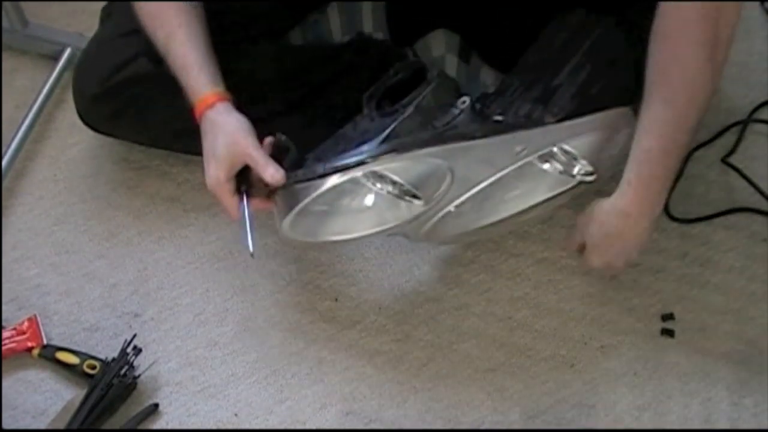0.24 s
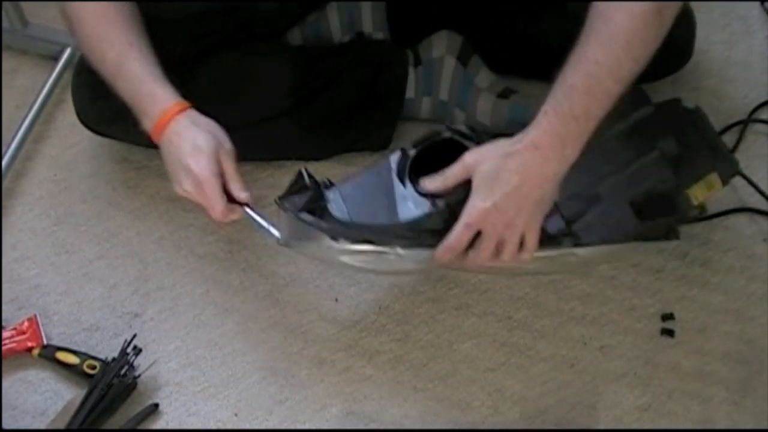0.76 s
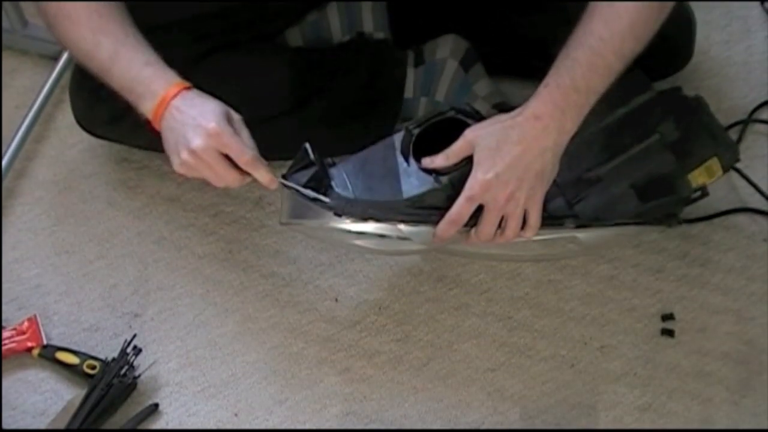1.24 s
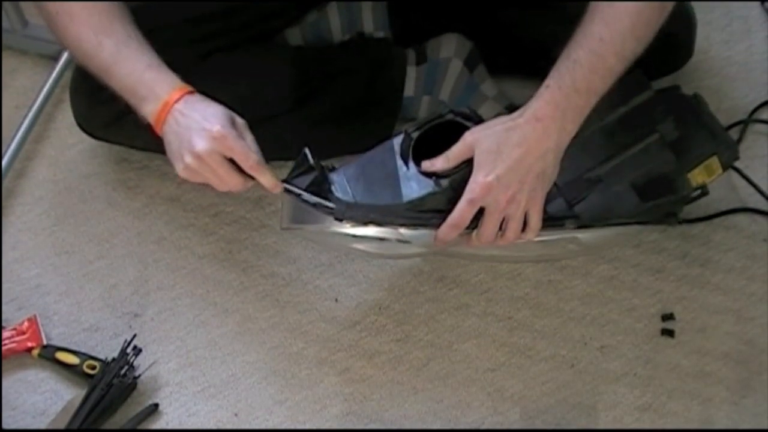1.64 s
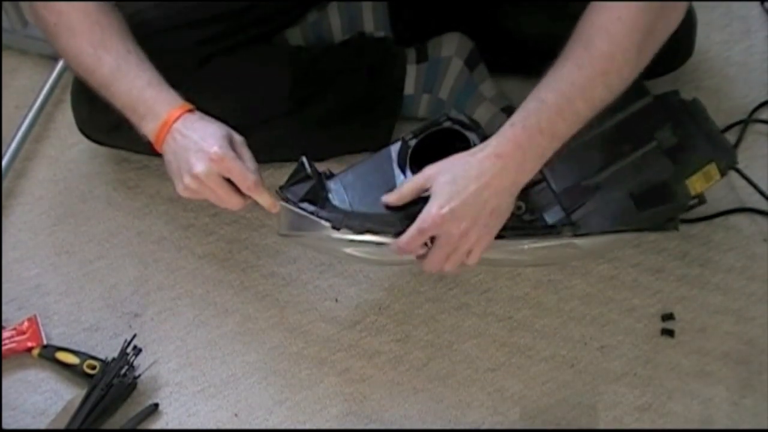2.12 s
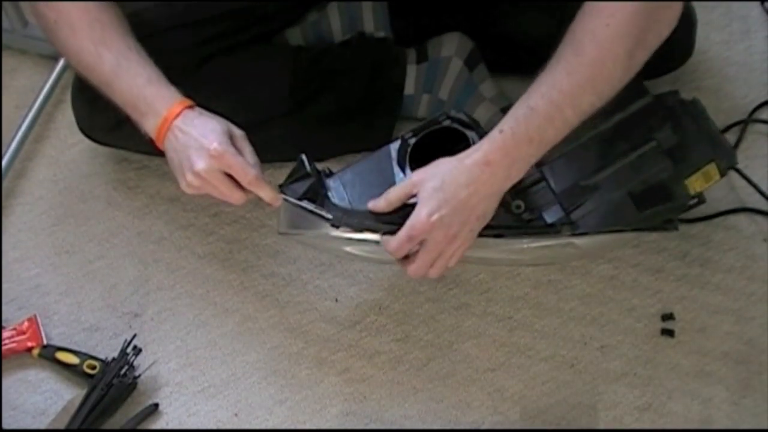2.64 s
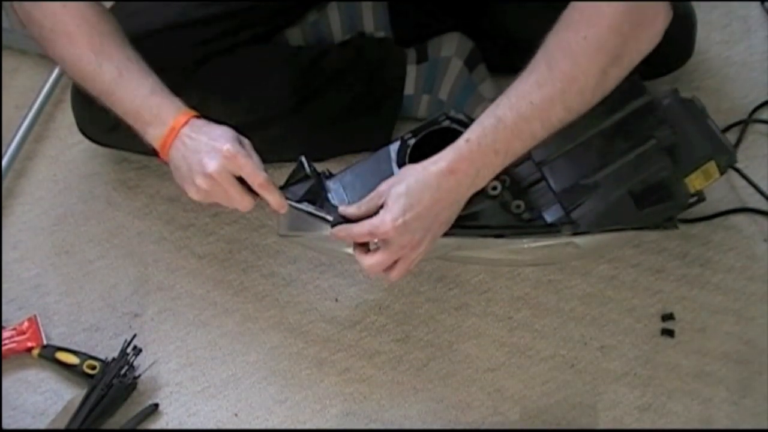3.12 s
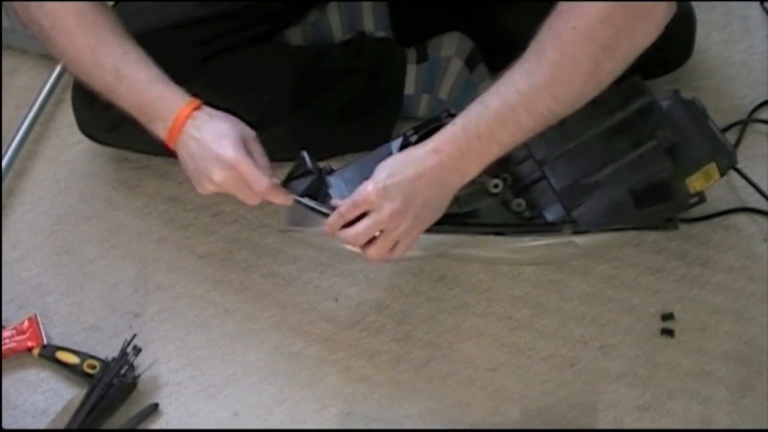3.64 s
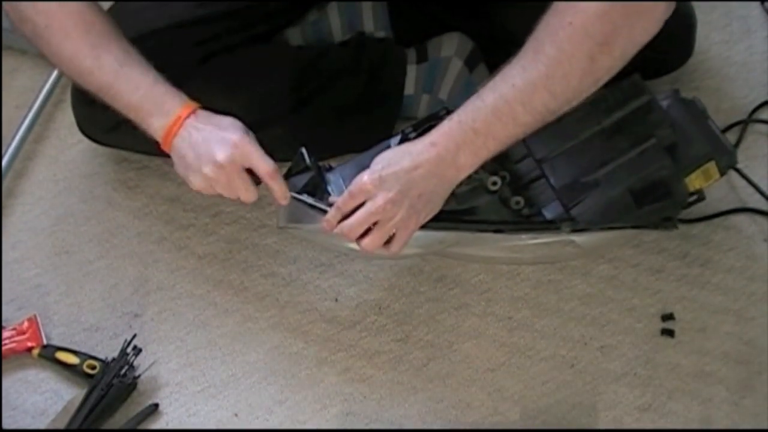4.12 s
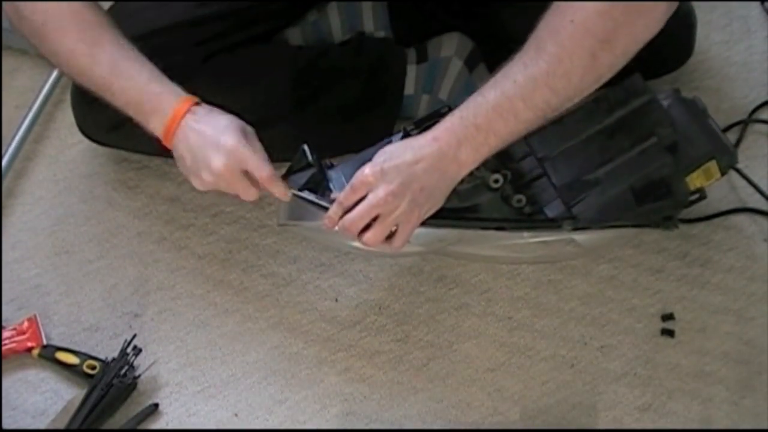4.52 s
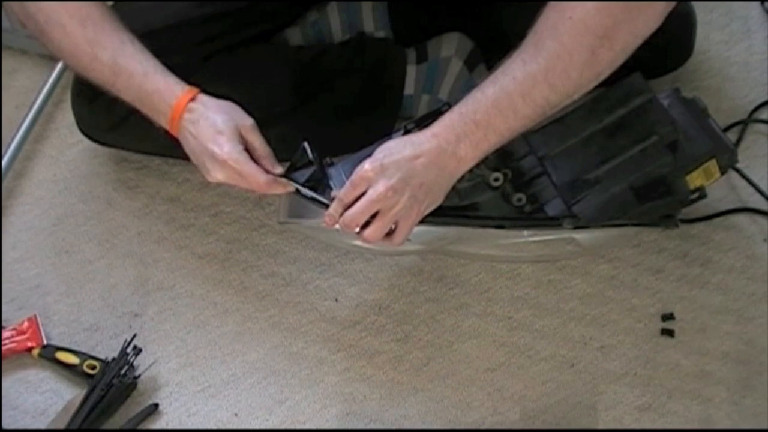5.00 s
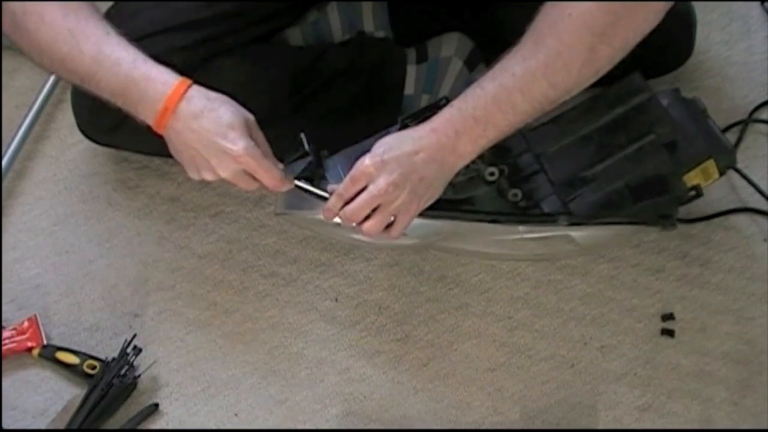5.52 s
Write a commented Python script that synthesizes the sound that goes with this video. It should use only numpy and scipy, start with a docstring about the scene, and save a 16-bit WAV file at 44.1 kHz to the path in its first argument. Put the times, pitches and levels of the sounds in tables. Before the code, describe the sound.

A plastic headlight housing lands on carpet with a hollow juddering thud, a thin blade ticks and scrapes along its rim, then a steel clip snaps off.

```python
"""A thin screwdriver pries steel spring clips off a plastic headlight housing on the carpet of a small room.
The housing is turned over and set down, the blade ticks and scrapes along its rim, and at last a clip snaps off.
Blows excite decaying modes over noise bursts; drags, hands, cloth and carpet are coloured friction noise in swells.
Judders and squeaks are stick-slip pulses; noise echoes make the room, over air noise, mains hum and faint pips."""
import sys
import numpy as np
from scipy import signal
from scipy.fft import rfft, irfft, next_fast_len
from scipy.io import wavfile
from scipy.ndimage import uniform_filter1d

SR = 44100
rng = np.random.default_rng(int(sys.argv[2]) if len(sys.argv) > 2 else 0)


def unload_wav(signal):
    """Save mono or channel-first audio to the path in sys.argv[1] as 16-bit WAV at rate SR, clipped to [-1, 1]."""
    wavfile.write(
        sys.argv[1],
        SR,
        np.round(np.clip(np.atleast_2d(signal).T, -1, 1) * 32767).astype(np.int16),
    )


N = 254324
RING_S = .16  # window of one short sound
T = np.arange(N) / SR
AGE = np.arange(int(RING_S * SR)) / SR
ECHO_AGE = np.arange(int(.4 * SR)) / SR

# air modes inside the housing: f/Hz, level/dB, t60/s
CAVITY_MODES = [(191.8, 5.5, 0.15), (232, 1.5, 0.31), (277, -3, 0.053), (324.4, -3, 0.23),
                (370.5, -1, 0.18), (475.8, -0.5, 0.23)]
# wall modes of the housing: f/Hz, level/dB, t60/s
SHELL_MODES = [(599, -4, 0.05), (765, -4, 0.083), (900, 0, 0.093), (990, -3.5, 0.068), (1119, 4.5, 0.026),
               (1301, -11, 0.019)]
# stiff ribs next to the blade: f/Hz, level/dB, t60/s
RIB_MODES = [(2784, 0.5, 0.041), (2932, -2.5, 0.05), (3145, 1, 0.045), (3590, 1, 0.046),
             (3830, -1.5, 0.042), (3997, -5, .025), (4594, 1, .03)]
# grooved rim that holds the clips: f/Hz, level/dB, t60/s
RIM_MODES = [(1587, -9.5, 0.055), (1706, 2.5, 0.042), (1844, -2.5, 0.06), (1984, -3, 0.045),
             (2138, -1.5, 0.026)]
# steel of clip and blade, damped by plastic and hand: f/Hz, level/dB, t60/s
STEEL_MODES = [(4676, -6.5, 0.011), (4746, 2, 0.016), (5020, 6.5, 0.019), (5220, 2, 0.013), (5450, 6, .007),
               (6050, -4, 0.012)]
# colour of the cavity's dense modes: f/Hz, level/dB
THUMP_COLOUR = [(80, -49), (150, -5.5), (195, 11.5), (250, 9), (350, -7), (500, 5.5), (800, 4),
                (2000, -31.5)]


def undb(db):
    """Decibels to gain."""
    return 10 ** (np.asarray(db) / 20)


def along(points, hz):
    """Read (f/Hz, value) points on a log-frequency axis."""
    f, value = np.transpose(points)
    return np.interp(np.log(np.maximum(hz, 1)), np.log(f), value)


def colour(x, points):
    """Causal minimum-phase filter with the given (f/Hz, level/dB) response, built from its cepstrum."""
    size = 2 * next_fast_len(len(x))
    log_gain = np.log(undb(along(points, np.fft.rfftfreq(size, 1 / SR))))
    cepstrum = irfft(log_gain)
    cepstrum[1:size // 2] *= 2
    cepstrum[size // 2 + 1:] = 0
    response = np.exp(rfft(cepstrum))
    return irfft(rfft(x, size) * response)[:len(x)]


def level(x, db):
    """Set the rms level."""
    return x * undb(db) / np.sqrt(np.mean(x ** 2))


def blow(x, db):
    """Set a short sound's energy to that of 20 ms at this rms level."""
    return x * undb(db) * np.sqrt(.02 * SR / np.sum(x ** 2))


def fade(t60, age=AGE):
    """Exponential decay from 1, down 60 dB after t60."""
    return np.exp(-np.log(1000) * age / np.maximum(t60, 1e-4))


def burst(t60, count=2):
    """Dying noise with an even spectrum: many modes too close to tell apart."""
    x = rng.standard_normal(len(AGE)) * fade(t60)
    for _ in range(count):
        flat = irfft(np.exp(1j * np.angle(rfft(x))), len(AGE))
        x = flat * fade(10 * t60) * (AGE < 2 * t60)
    return x


def ring(modes, scatter_db=1.0, detune=0.0036):
    """Struck modes; each point of contact and grip weights and shifts them a little."""
    hz, db, t60 = np.transpose(modes)[:, :, None]
    size, shift, sign = rng.standard_normal((3, len(modes), 1))
    waves = np.sign(sign) * np.sin(2 * np.pi * hz * (1 + detune * shift) * AGE)
    return np.sum(undb(db + scatter_db * size) * waves * fade(t60), axis=0)


def body(modes, spectrum, dense_t60, modes_db):
    """A struck part: clear modes over a quickly dying mass of others."""
    clear = blow(ring(modes), modes_db)
    dense = blow(colour(burst(dense_t60), spectrum), 0)
    return clear + dense


def add(track, s, x):
    """Mix a sound in at time s."""
    start = max(int(s * SR), 0)
    track[start:start + len(x)] += x[:N - start]


def friction(slips_per_s, spread_db, smooth_db):
    """Tiny slips of uneven size over the smooth hiss of sliding."""
    hits = rng.random(N) < slips_per_s / SR
    slips = hits * rng.standard_normal(N) * undb(spread_db * rng.standard_normal(N))
    return level(level(slips, 0) + undb(smooth_db) * rng.standard_normal(N), 0)


def swells(rows):
    """Each stroke swells and fades in a bell; overlapping strokes add in power."""
    return np.sqrt(sum(undb(db) ** 2 * np.exp(-((T - s) / half_s) ** 2) for s, half_s, db in rows))


def room_tone():
    """Steady air noise, wide in the bass, with mains hum, the thin whine of a small motor and pips."""
    # colour of the air noise: f/Hz, level/dB
    air_colour = [(15, -43.5), (25, -24), (54, -18), (88, -13), (121, -16), (176, -13.5), (438, -16.5),
                  (475, -16), (811, -22.5), (1090, -18.5), (1310, -24), (3540, -31), (11000, -40.5),
                  (15000, -51.5), (16000, -69)]
    # steady tones of hum and whine: f/Hz, level/dB
    hum_tones = [(119.3, -67), (721.4, -80.5), (1082, -74.5), (1443, -82.5)]
    # both start at equal rms, before the side colour and the mid gain
    mid, side = (level(colour(rng.standard_normal(N), air_colour), -58.5) for _ in range(2))
    side = colour(side, [(70, 1.0), (140, 5), (1000, 2), (8000, -5.5)])
    hum = sum(level(np.sin(2 * np.pi * (hz * T + rng.random())), db) for hz, db in hum_tones)
    return undb(-5.0) * mid + hum + pips() + side * np.array([[1], [-1]])


def rubbing():
    """Cloth, palms and pile hiss in strokes over a faint hand creep; cloth and creep make the shell murmur."""
    # housing brushes trousers and carpet: peak t/s, bell sigma/s, level/dB
    swish_rows = [(.1, 0.11, -62.5), (.315, 0.064, -55.5), (.41, 0.037, -55.5), (.52, 0.12, -51.5),
                  (.66, 0.049, -72), (.82, 0.021, -53.5), (.91, .035, -75), (1.06, 0.0073, -59.5),
                  (1.19, 0.047, -69), (2.08, 0.043, -61), (2.255, 0.011, -76), (2.72, 0.03, -71),
                  (2.94, 0.036, -61), (3.34, 0.081, -73.5)]
    # palm slides to a new hold: peak t/s, bell sigma/s, level/dB
    slide_rows = [(.088, 0.037, -49), (.31, 0.021, -74), (.41, 0.1, -55.5), (.56, 0.06, -56.5),
                  (.76, 0.081, -58), (.92, 0.014, -53.5), (1.08, 0.062, -77), (1.205, 0.091, -62.5),
                  (1.4, 0.1, -69), (2.045, 0.044, -61), (2.127, 0.011, -54.5), (2.245, 0.02, -61.5),
                  (2.61, 0.036, -59.5), (2.735, 0.053, -59.5), (2.93, 0.055, -55.5), (3.05, 0.0097, -58.5),
                  (3.15, 0.029, -69), (3.28, 0.015, -64.5), (3.375, 0.026, -68)]
    # carpet pile rasps as the housing shifts: peak t/s, bell sigma/s, level/dB
    rasp_rows = [(.085, 0.022, -57), (.545, 0.028, -55), (.92, 0.056, -65), (1.05, .04, -76),
                 (3.34, 0.046, -75)]
    # friction colours of cloth, palm, pile and the shell's murmur: f/Hz, level/dB
    cloth_colour = [(800, -5), (1800, -6), (2500, -3), (3000, -2.5), (3500, -8.5), (4200, -4.5),
                    (4800, -9.5), (6000, -4.5), (8000, -22), (12000, -39.5), (16000, -47)]
    skin_colour = [(3000, -5.5), (6000, -2.5), (7000, 3), (8000, -2), (9500, -2.5), (12000, -15.5),
                   (15000, -24.5), (16000, -47)]
    pile_colour = [(4000, -22), (8000, 0), (10000, -1), (13000, -7), (15000, -14), (16000, -29)]
    murmur_colour = [(90, -8.5), (200, 6), (400, -1.5), (900, 1.5), (1600, 2.5), (3000, -24)]
    creep_end_s = 3.51
    creep_cloth_db, creep_skin_db, creep_murmur_db = -73, -71.5, -65.5
    murmur_db = -3  # against the cloth that drives it

    creep = (T <= creep_end_s).astype(float)
    cloth = np.hypot(swells(swish_rows), undb(creep_cloth_db) * creep)
    skin = np.hypot(swells(slide_rows), undb(creep_skin_db) * creep)
    murmur = np.hypot(undb(murmur_db) * cloth, undb(creep_murmur_db) * creep)
    layers = ((cloth, cloth_colour), (skin, skin_colour),
              (swells(rasp_rows), pile_colour), (murmur, murmur_colour))
    out = np.zeros(N)
    for gain, spectrum in layers:
        rub = friction(slips_per_s=760, spread_db=-2.5, smooth_db=2.5)
        out += gain * level(colour(rub, spectrum), 0)
    return out


def bumps():
    """Padded blows push for longer, so only the lowest modes answer; carpet and palm damp them."""
    # housing on floor, palm on housing: t/s, level/dB, contact corner f/Hz
    bump_rows = [(.112, -48, 386), (0.124, -48, 436), (.477, -34, 800), (.564, -37.5, 220),
                 (.925, -51.5, 390), (.965, -51, 300), (1.065, -60.5, 306), (1.331, -53.5, 302),
                 (1.531, -63, 300), (1.832, -47.5, 700), (2.101, -48, 1340), (2.471, -48.5, 890),
                 (2.477, -49, 520), (2.565, -48.5, 506), (2.92, -55, 214), (3.015, -49, 670),
                 (3.056, -47.5, 220), (3.11, -53, 250), (3.275, -59, 1320), (3.402, -55.5, 240),
                 (3.438, -55.5, 240), (3.518, -55, 503), (3.692, -59, 400), (3.76, -58.5, 395),
                 (4.382, -61, 604)]
    out = np.zeros(N)
    damping = fade(.1)
    for s, db, corner_hz in bump_rows:
        cavity = body(CAVITY_MODES, THUMP_COLOUR, dense_t60=0.1, modes_db=1.0)
        walls = blow(ring(SHELL_MODES), -1.025)
        lowpass = signal.butter(2, corner_hz, fs=SR, output="sos")
        add(out, s, blow(signal.sosfilt(lowpass, (cavity + walls) * damping), db))
    return out


def scrapes():
    """Blade drags: a swell of slips coloured by the shell, tilted in brightness, rings rim, ribs and steel."""
    # drags over the rim: peak t/s, bell sigma/s, grit level/dB at peak, tilt/(dB per octave),
    # rim and rib ring against grit/dB, steel ring against grit/dB
    scrape_rows = [(0.113, 0.02, -50, 0.5, -11, -10), (0.481, 0.0031, -43, 6.5, -18, -12),
                   (0.537, 0.021, -47.5, 4, -19, -13), (0.918, 0.031, -43, -2.5, -16.5, -22),
                   (1.645, 0.0063, -44.5, -1, -13, -12), (1.824, 0.0043, -53, 2, -20, -4),
                   (1.851, 0.011, -50.5, -5, -10, -22), (1.8685, 0.0031, -41, 9, -9, -5),
                   (2.297, 0.0018, -39, 4, 0.5, 1.5), (2.418, 0.0084, -58.5, 4, -8, 0.5),
                   (2.554, 0.013, -56.5, 6.5, -17, -6), (3.0065, 0.004, -45, 5, -19, -12),
                   (3.014, 0.014, -45.5, -5.5, -19, -32), (3.513, 0.004, -58, 2, -7, -14),
                   (3.697, 0.0027, -54, 12, -7, -21), (3.898, 0.013, -48.5, 0.5, -18, -13),
                   (4.5, 0.0091, -52, 1, -8, -6), (4.522, 0.014, -60.5, -5, -16, -18),
                   (5.635, 0.031, -50, -0.5, -27, -15)]
    # colour of the drag: f/Hz, level/dB
    grit_colour = [(100, -16), (220, 5.5), (400, 1), (900, 5.5), (1350, 4.5), (1900, 4), (3500, -2.5),
                   (4300, -5.5), (5000, -8), (8000, -8), (10500, -19), (15000, -51.5)]
    out = np.zeros(N)
    slips = friction(slips_per_s=1800, spread_db=2.5, smooth_db=0)
    for s, half_s, db, tilt_db, rim_db, steel_db in scrape_rows:
        drag = slips[rng.integers(N - len(AGE)):][:len(AGE)]
        swell = np.exp(-.5 * ((AGE - RING_S / 2) / half_s) ** 2)
        tilted = [(hz, g + tilt_db * np.log2(hz)) for hz, g in grit_colour]
        grit = level(colour(drag, tilted), db) * swell
        rings = np.zeros(len(AGE))
        for modes, ring_db in ((RIM_MODES + RIB_MODES, rim_db), (STEEL_MODES, steel_db)):
            rings += level(signal.oaconvolve(drag * swell, ring(modes))[:len(AGE)], ring_db)
        add(out, s - RING_S / 2, grit + np.std(grit) * rings)
    return out


def judders(count=9, jitter=0.096):
    """The housing sticks and slips as it lands; each slip pushes its walls and rings the air inside."""
    # judders on the carpet: peak t/s, bell sigma/s, wall level/dB, slip rate/Hz
    judder_rows = [(.484, 0.0051, -23.5, 223), (.5155, 0.0044, -21, 245), (.541, 0.006, -31.5, 205)]
    # colour of the wall's push: f/Hz, level/dB
    push_colour = [(100, -15.5), (160, 4), (240, 0.5), (360, -1), (480, -4), (600, -19), (760, -18),
                   (1200, -31), (2500, -40), (8000, -90)]
    cavity_db = -9  # against the push
    out = np.zeros(N)
    for s, half_s, db, slips_per_s in judder_rows:
        slips = np.zeros(len(AGE))
        lags = (np.arange(count) - count // 2 + jitter * rng.standard_normal(count)) / slips_per_s
        slips[((lags - lags[0]) * SR).astype(int)] = np.exp(-.5 * (lags / half_s) ** 2)
        push = colour(slips, push_colour)
        hollow = signal.oaconvolve(push, ring(CAVITY_MODES))[:len(AGE)]
        add(out, s + lags[0], blow(push, db) + blow(hollow, db + cavity_db))
    return out


def chatter(modes, count=3):
    """Steel bounces on steel: a few uneven touches, each weaker and held differently, roughen the ring."""
    mean_gap_s, loss_db = 0.0015, -5  # loss per touch
    out, s = np.zeros(len(AGE)), 0
    for touch, gap in enumerate(rng.uniform(.5, 1.5, count)):
        start = int(s * SR)
        out[start:] += undb(loss_db * touch) * ring(modes, detune=0.0099)[:len(AGE) - start]
        s += gap * mean_gap_s
    return out


def contacts(rows, thump_db, steel_db, crack_t60):
    """Steel slips and hits tick, shake ribs and rim and ring the steel; shell and cavity follow the strength."""
    # colours of blade tip, ribs, rim and shell: f/Hz, level/dB
    tick_colour = [(2500, -11.5), (4500, -11.5), (6000, 0.5), (8000, -4), (10000, -5.5), (11500, -19.5),
                   (13500, -39), (16000, -49)]
    crack_colour = [(1200, -16), (2000, 2), (2400, -2), (3400, 7.5), (4000, 3.5), (4500, -7), (8000, -36.5)]
    clack_colour = [(700, -23.5), (1300, -4), (1700, -7.5), (2100, -10), (2600, -8), (5000, -55)]
    knock_colour = [(200, -10), (500, -8), (740, 6.5), (950, 2.5), (1300, -7.5), (1800, -16), (4000, -39)]
    out = np.zeros(N)
    for s, strength, tip, rim, ribs, steel in rows:
        tick = colour(burst(crack_t60), tick_colour)
        crack = body(RIB_MODES, crack_colour, dense_t60=crack_t60, modes_db=0.0)
        clack = body(RIM_MODES, clack_colour, dense_t60=crack_t60, modes_db=4.0)
        knock = body(SHELL_MODES, knock_colour, dense_t60=.045, modes_db=6.5)
        thump = body(CAVITY_MODES, THUMP_COLOUR, dense_t60=0.015, modes_db=1.5)
        add(out, s, blow(tick, strength + tip))
        add(out, s, blow(crack, strength + ribs))
        add(out, s, blow(clack, strength + rim))
        add(out, s, blow(knock, strength))
        add(out, s, blow(thump, strength + thump_db))
        add(out, s, blow(chatter(STEEL_MODES), strength + steel + steel_db))
    return out


def pips():
    """Faint one-pitch pips, a sine in a bell, on a steady 40 ms beat with many beats left out,
    perhaps a focus motor stepping."""
    # bell peaks: t/s
    pip_times_s = [3.254, 3.333, 3.414, 3.533, 3.614, 3.694, 3.854, 4.053, 4.333, 4.614, 4.653, 4.733,
                   4.933, 5.014, 5.134, 5.213, 5.333]
    pip_hz, peak_db, sigma_s = 2320, -62, 0.0017
    out = np.zeros(N)
    pip = np.sin(2 * np.pi * pip_hz * AGE) * np.exp(-.5 * ((AGE - RING_S / 2) / sigma_s) ** 2)
    for s in pip_times_s:
        add(out, s - RING_S / 2, undb(peak_db) * pip)
    return out


def squeaks(slips_per_s=110, jitter=0.15, count=16):
    """The blade sticks and slips under the strained clip; each slip rings the pinched parts."""
    # creaks: peak t/s, bell sigma/s, level/dB
    squeak_rows = [(4.87, 0.014, -63), (4.899, 0.0052, -63.5)]
    # blade and clip pinched together: f/Hz, level/dB, t60/s
    pinched_modes = [(1445, 3, 0.034), (2960, 2, .012), (3400, 0, .012), (3800, -3, .012), (4400, 3, .012),
                     (8100, -3, .015), (9040, -5, 0.016), (10200, -14, .015)]
    out = np.zeros(N)
    for s, half_s, db in squeak_rows:
        slips = np.zeros(N)
        lags = (np.arange(count) - count / 2 + jitter * rng.standard_normal(count)) / slips_per_s
        sizes = np.exp(-.5 * (lags / half_s) ** 2) * rng.uniform(0.45, 1, count)
        slips[((s + lags) * SR).astype(int)] = sizes
        out += blow(signal.oaconvolve(slips, ring(pinched_modes))[:N], db)
    return out


def snap():
    # clip lets go, then strikes the rim: t/s, strength/dB, then against strength: tip/dB, rim/dB,
    # ribs/dB, steel/dB (before steel_db)
    snap_rows = [(5.391, -26, -3, -6, 2, -0.5), (5.392, -26, 4, -4.5, 0.87, -6)]
    # spring clip once nothing holds it: f/Hz, level/dB, t60/s
    freed_modes = [(3364, -6, 0.14), (5500, -6, 0.07), (6260, -3, 0.08), (7000, 3.5, 0.073),
                   (7560, 2, 0.065)]
    # colours of the release and the wall's slap: f/Hz, level/dB
    release_colour = [(1000, -2.5), (1400, 4), (2200, -1), (2900, -4.5), (3500, 5), (4200, -2.5), (4900, 2),
                      (6500, -2), (8000, 3.5), (11000, -4), (13000, -8.5), (16000, -12.5)]
    slap_colour = [(120, -28), (170, -14.5), (255, 2.5), (340, 1.5), (470, 3.5), (620, 2.5), (800, -2.5),
                   (1400, -5.5), (2400, -5.5), (4000, -8), (8000, -38.5)]
    out = contacts(snap_rows, thump_db=-10.5, steel_db=-1.5, crack_t60=0.011)
    release_s, strike_s = snap_rows[0][0], snap_rows[1][0]
    add(out, release_s, blow(colour(burst(0.009), release_colour), -20.0))
    add(out, strike_s, blow(colour(signal.unit_impulse(len(AGE)), slap_colour), -23))
    add(out, strike_s, blow(ring(freed_modes), -31))
    return out


def strikes(steel_db):
    """All blows as they radiate in one direction, with that direction's own mix of modes."""
    # blade and clip contacts: t/s, strength/dB, then against strength: tip/dB, rim/dB,
    # ribs/dB, steel/dB (before steel_db)
    click_rows = [(.75, -35, -14, -1.5, -10.5, -21), (1.2261, -39, 1, 0, 1, 15.5),
                  (1.3394, -50, -5, -0.5, -2.5, 6.5), (1.6286, -46, -29, -1.5, -10, -8),
                  (1.6549, -31, -15.5, 1.5, -10.5, -8), (1.6605, -37.5, -22, -16, -15, -14),
                  (1.8305, -64, 7, -10, -6, 0), (1.8642, -54, 5, -1, 0, 4),
                  (1.8927, -41, -3, -0.5, -2.5, 8), (1.9177, -36, -1.5, -4, -4.5, 9.5),
                  (1.927, -37, -12, -11, -4.5, -10), (2.2972, -43.5, 0, 2, 2, -2),
                  (2.5619, -44.5, -2.5, -8, -4, 1.5), (3.686, -63.5, 2, -4, -9, -14),
                  (3.7531, -68, 4.5, 1, -11, -15), (4.4949, -65, 2.5, -10, 2, 6),
                  (4.9023, -67, -3, -14, -4, -7), (5.231, -76.5, -12, -12, 5, -1),
                  (5.5949, -59.5, 6, -2.5, -13, -7), (5.6208, -55, 0.5, 1, 1.5, 5)]
    clicks = contacts(click_rows, thump_db=-10.5, steel_db=steel_db, crack_t60=0.046)
    return clicks + snap() + bumps()


def echoes(early_db=11.0, gap_s=0.0034):
    """Strong early reflections off floor and furniture, then a tail that loses its treble first."""
    # decay of the room: f/Hz, t60/s
    room_decay = [(200, .34), (900, .32), (2000, .3), (5000, .29), (8000, .26), (13000, .16)]
    # colour of the echoes against the direct sound: f/Hz, level/dB
    room_colour = [(150, -3.5), (205, 4), (290, 3.5), (500, 3), (900, -5), (1500, -4.5), (3000, -4.5),
                   (8000, -6.5), (13000, -18)]
    freqs = np.fft.rfftfreq(len(ECHO_AGE), 1 / SR)
    noise = rfft(rng.standard_normal(len(ECHO_AGE)))
    centres = [hz for hz, _ in room_decay]
    early = undb(early_db) * fade(.14, ECHO_AGE)
    tail = 0
    for (hz, t60), share in zip(room_decay, np.eye(len(centres))):
        band = irfft(noise * along(list(zip(centres, share)), freqs), len(ECHO_AGE))
        tail = tail + band * (fade(t60, ECHO_AGE) + early)
    tail = tail * np.clip(ECHO_AGE / gap_s - .5, 0, 1)
    # a diffuse field carries even power in every band before the walls colour it
    power = uniform_filter1d(np.abs(rfft(tail)) ** 2, size=32)
    gain_db = along(room_colour, freqs) - 10 * np.log10(power)
    return colour(tail, np.column_stack([freqs, gain_db])[1:])


def room(x):
    """The walls' answer as mid and side, each with its own echoes."""
    # side echoes against mid: f/Hz, level/dB
    side_colour = [(150, -13.5), (1000, -12), (2500, -11), (5000, -14.5), (8000, 4), (12000, -1)]
    responses = (echoes(), colour(echoes(), side_colour))
    return np.array([signal.oaconvolve(x, response)[:N] for response in responses])


def scene(count=2):
    """The clips' ping faces the microphones, mostly direct; the walls gather all directions into a smooth tail."""
    facing = strikes(steel_db=-5.0)
    directions = [facing] + [strikes(steel_db=-15.5) for _ in range(count)]
    sliding = scrapes() + squeaks() + rubbing()
    landing = judders()
    strike_room = sum(room(x) for x in directions) / np.sqrt(len(directions))
    mid, side = strike_room + room(sliding + undb(-10) * landing)
    mid = mid + facing + sliding + landing
    # a shell this small radiates no deep bass
    no_bass = signal.butter(6, 128, "high", fs=SR, output="sos")
    return signal.sosfilt(no_bass, [mid + side, mid - side]) + room_tone()


def record(dry):
    """Two close, slightly unequal microphones; peaks clip at full scale and the top is cut."""
    # channel balance: f/Hz, left minus right level/dB
    balance = [(120, 0), (280, -1.5), (1000, -1.5), (4500, 0.85), (8000, 1.5), (12000, -1)]
    top_hz = 15600
    ports = [colour(x, [(hz, sign * db / 2) for hz, db in balance]) for x, sign in zip(dry, (1, -1))]
    lowpass = signal.ellip(8, .2, 85, top_hz, fs=SR, output="sos")
    return signal.sosfilt(lowpass, np.clip(ports, -1, 1))


dry = scene()
out = record(dry)
unload_wav(out)
```